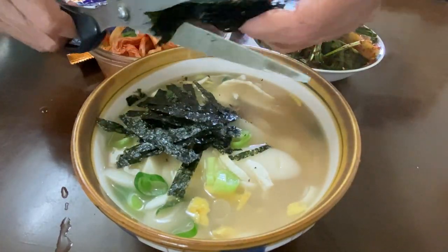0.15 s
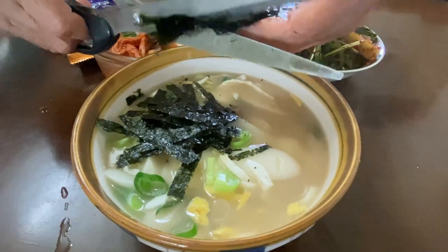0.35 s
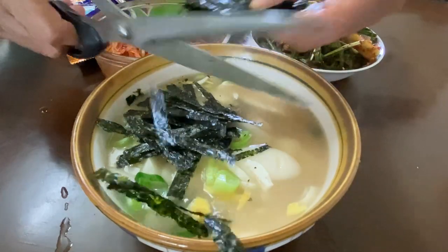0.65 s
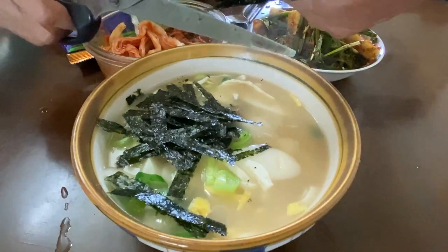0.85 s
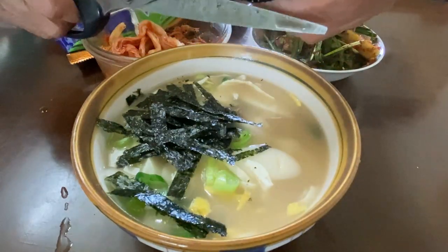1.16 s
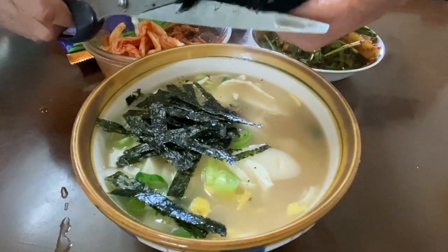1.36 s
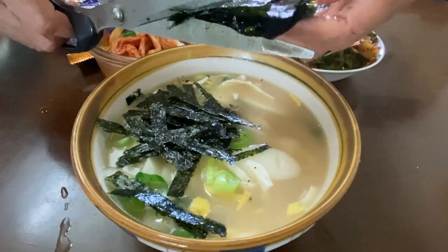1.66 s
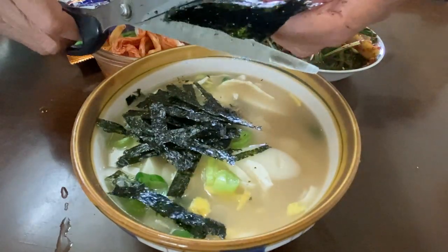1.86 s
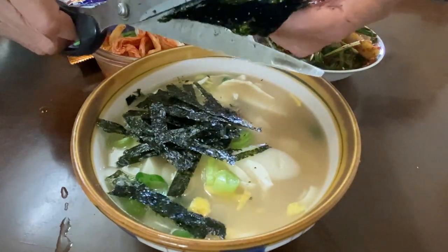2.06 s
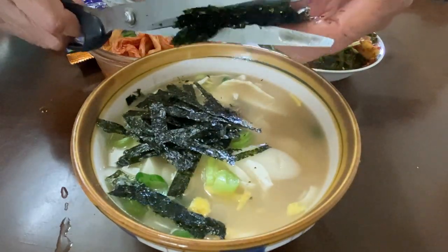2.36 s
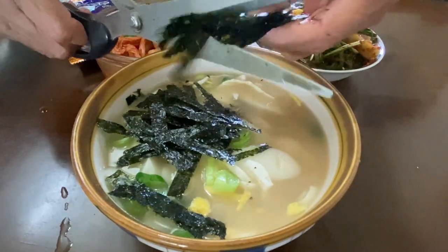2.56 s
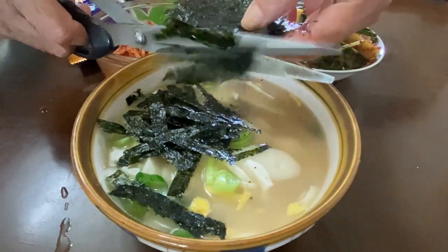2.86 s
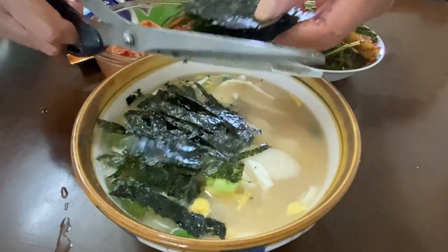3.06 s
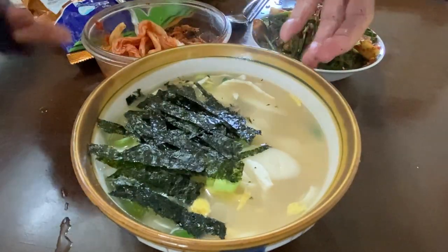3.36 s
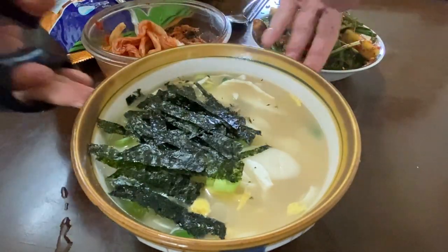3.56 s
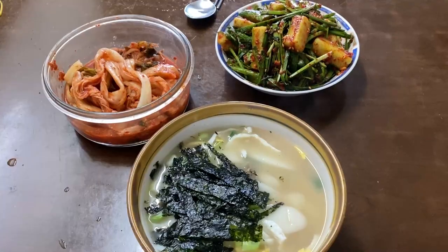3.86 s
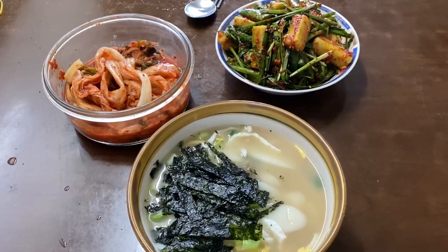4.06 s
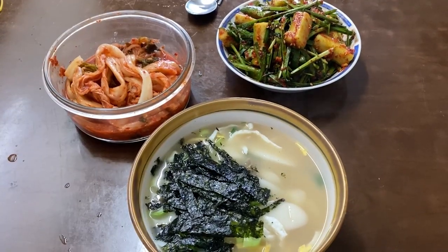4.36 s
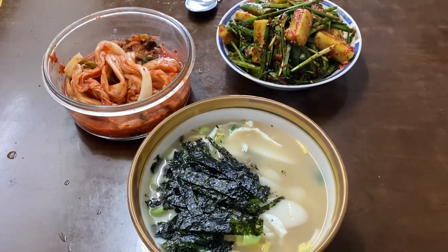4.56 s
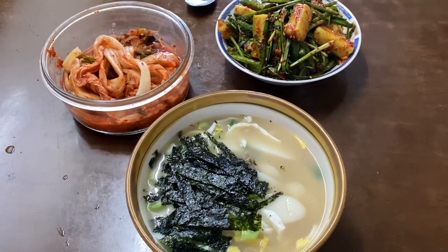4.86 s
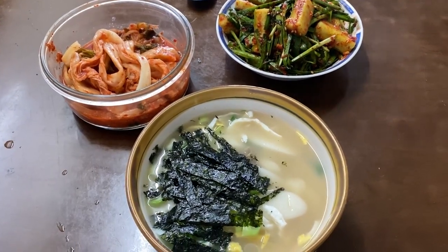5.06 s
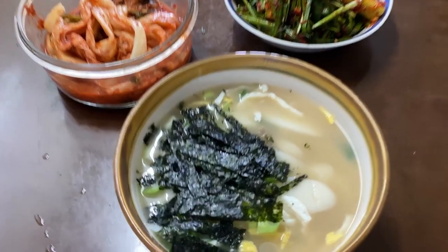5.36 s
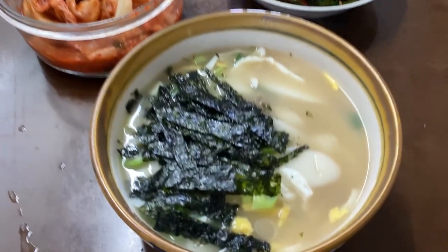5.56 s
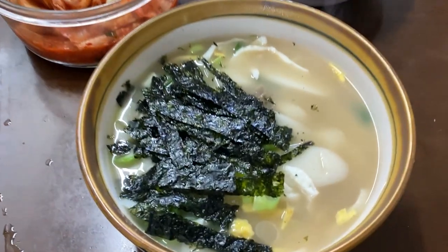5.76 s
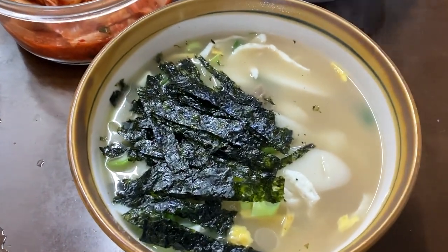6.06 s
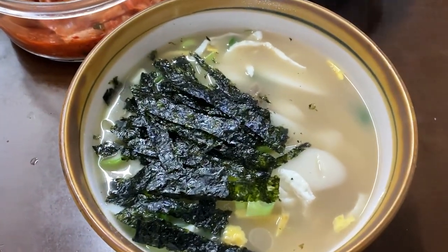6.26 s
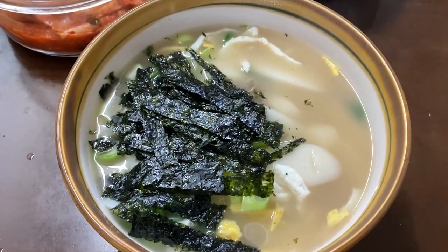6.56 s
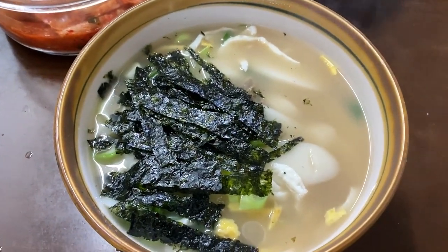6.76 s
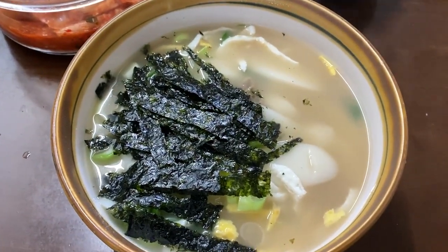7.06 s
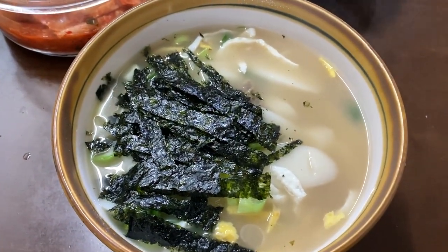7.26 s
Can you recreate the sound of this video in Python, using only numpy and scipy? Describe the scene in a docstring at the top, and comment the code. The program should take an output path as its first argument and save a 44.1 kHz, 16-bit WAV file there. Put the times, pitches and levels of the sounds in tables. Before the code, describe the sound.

A quiet indoor room with soft air and a faint wavering low hum. Close to a phone's stereo microphones, scissors cut dried seaweed: dry rubbing, then a dense, bright run of brittle snaps from 0.2 to 0.45 s, with a dull low bump at its end. A lull with tiny ticks follows; a second crackling cut builds from about 1.05 to 1.3 s. Sparse crinkles, one snap near 1.9, then crunches at 2.15-2.35 and 2.65-2.85 s, the last with another soft bump. Cracking fades by 3.4 s. A light steely click at 3.25 and small taps near 3.55 and 3.75 lead to a firmer double wooden knock at 4.15. Until about 5.4 s a crinkly, hollow rustle further off mixes with short gritty scrapes and a muted knock at 4.75. Near silence follows, with a tiny tick at 6.75, then the loudest table knock, sharp and briefly ringing, at 7.1 s.

```python
"""Scissors through dried seaweed

Kitchen scissors cut a crisp sheet over a bowl, close to a phone's two microphone ports: clumped noise snaps,
opened in short bursts over a fine rustle, are coloured as thin sheet and folded stack, with room decay behind.
The scissors are laid on the wooden table and a hard object knocks it: clicks, decaying noise and damped modes.
Gritty noise scrapes, sagging low bumps and a hissing, hollow rustle further off join them.
A quiet room lies underneath: shaped noise, a wavering low hum and a faint unsteady tone."""
import sys
import numpy as np
from scipy import signal
from scipy.fft import rfft, irfft, next_fast_len
from scipy.io import wavfile
from scipy.ndimage import uniform_filter1d, map_coordinates

SR = 44100
rng = np.random.default_rng(int(sys.argv[2]) if len(sys.argv) > 2 else 0)


def file_out(sig):
    """Save sig as 16-bit WAV at sys.argv[1]."""
    # one column per channel
    cols = np.atleast_2d(sig).T
    # limit, then scale
    lim = np.clip(cols, -1, 1)
    pcm = np.round(lim * 32767).astype(np.int16)
    wavfile.write(sys.argv[1], SR, pcm)


N = 327222  # samples

# Steady room air. Each row: frequency in Hz, relative density in dB per Hz.
AIR_COLOUR = [(15, -30), (25, -17.5), (50, -8.5), (210, -11.5), (600, -23.5), (1270, -31), (2000, -41),
              (4000, -57), (10000, -58), (13000, -66), (16000, -85.5)]
# Likeness of the air at the two ports. Each row: frequency in Hz, correlation from 0 to 1.
AIR_LIKENESS = [(60, 0.79), (240, 0.81), (950, 0.06), (3770, 0.12), (15000, 0.017)]
# Low hum of the room. Each row: time in seconds, level in dB before a common lift.
HUM_LEVEL = [(0, -72), (1.75, -66.5), (3, -68), (4.1, -54.5), (4.34, -45.5), (4.46, -61.5), (4.98, -51),
             (5.1, -61), (6.2, -56), (6.5, -58.5), (6.86, -46), (7.09, -54.5), (7.21, -46), (7.42, -45)]
# Faint unsteady tone over the hum. Each row: mean frequency in Hz, mean level in dB.
DRONE_TONES = [(218, -64)]
# The sheet rubs on fingers and blades. Each row: time in seconds, level in dB.
RUB_LEVEL = [(0, -48.5), (.19, -50.5), (.4, -47.5), (.52, -61.5), (.86, -89), (.93, -72), (.95, -49),
             (1.04, -59), (1.3, -50), (1.4, -56.5), (1.53, -75.5), (1.61, -67.5), (1.65, -51),
             (2.05, -55.5), (2.25, -40.5), (2.37, -50.5), (2.72, -43), (2.86, -55), (3.01, -63),
             (3.19, -59.5), (3.26, -73), (3.5, -89)]
# Bursts of cracking fibres. Each row: peak time in seconds, level in dB, stack relative to sheet in dB,
# fall time in ms.
CRACK_BURSTS = [(0.034, -39, -9.5, 8.2), (0.198, -40, -6, 25), (.228, -33.5, -11, 4.5),
                (.255, -38, -9.5, 6), (.282, -26, -8.5, 5), (.308, -28.5, -5, 11.7), (.341, -22, -8, 6.6),
                (.375, -24, -13, 5.4), (.395, -26.5, -10.5, 9.7), (.423, -24.5, -2, 6.7),
                (0.443, -25, -9, 7.8), (0.608, -49.5, -6, 6), (0.639, -50, -9.5, 12), (.707, -57, -23, 2.2),
                (.759, -47.5, -13, 3.8), (0.986, -43.5, -2.5, 7.5), (1.068, -45, 0, 22),
                (1.107, -38.5, -8, 4), (1.145, -38.5, -25, 4.7), (1.17, -38, -11, 4.9),
                (1.205, -33.5, -13.5, 6), (1.224, -28, -13.5, 6), (1.274, -24.5, -14.5, 5.7),
                (1.352, -47, -10, 10), (1.741, -48.5, -18, 3.6), (1.819, -53, -1.5, 14),
                (1.874, -34, -16.5, 6.8), (2.057, -38.5, -12, 3), (2.11, -47.5, -10, 17),
                (2.154, -39, -14.5, 22), (2.189, -33, -15.5, 11), (2.217, -29, -13.5, 15),
                (2.244, -23.5, -6, 7), (2.268, -25.5, -17, 9), (2.29, -22.5, -12.5, 12),
                (2.336, -27, -11.5, 4.8), (2.399, -47.5, -17, 7), (2.532, -47.5, -14, 7.4),
                (2.619, -43.5, -8.5, 11), (2.664, -31, -25.5, 4.09), (2.676, -24.5, -8, 5),
                (2.686, -32.5, -13, 12.4), (2.716, -23, -14, 6), (2.741, -25.5, -10.5, 8.7),
                (2.794, -27.5, -4.5, 8), (2.833, -31.5, -11, 11), (3.066, -56, -19, 7.8),
                (3.151, -42.5, -15.5, 3.5), (3.182, -51, -22, 8), (3.271, -50, -41, 2.2),
                (3.302, -60, -6, 4), (3.378, -55, -23, 1.5)]
# Thin sheet. Each row: frequency in Hz, relative density in dB per Hz.
SHEET_COLOUR = [(1290, -44), (2200, -5), (2480, -18), (3220, -2.5), (3940, -6.5), (4820, -0.5),
                (6100, -5.5), (6580, -3), (8770, -3), (11500, 2), (13500, -6), (15800, 0), (16500, -42.5)]
# Folded stack and blades. Each row: frequency in Hz, relative density in dB per Hz.
STACK_COLOUR = [(180, -32.5), (300, -8), (883, -8.5), (1150, 0), (1860, -1), (3200, -3), (4160, -36),
                (7040, -120)]
# Phase between the ports. Each row: frequency in Hz, lead of the left in radians.
PORT_LEAD = [(0, 1.1), (3100, 2.78), (3620, 4.85), (4570, 4.12), (6460, 4.47), (7240, 9.76), (9300, 16),
             (10300, 11.3), (11800, 11.34), (16000, 7.6)]
# Balance between the ports. Each row: frequency in Hz, left over right in dB.
PORT_TILT = [(60, -1.5), (180, -2), (550, 3.5), (1650, 5.5), (4970, 3), (15000, -3.5)]
# Soft low bumps. Each row: start in seconds, strength in dB, settled pitch in Hz, 60 dB decay in seconds.
LOW_BUMPS = [(0.467, -30, 61.2, 0.14), (2.788, -27, 50, 0.17), (3.516, -46, 103, 0.3),
             (3.586, -36.5, 77, 0.32), (5.307, -40, 200.6, 0.1)]
# Single scrapes and crinkles. Each row: peak time in seconds, level in dB, centre in Hz,
# band half-width in octaves, time scale in ms.
SCRAPE_EVENTS = [(.49, -43.5, 395, 1.9, 18), (2.822, -38, 399, 2.15, 25), (3.561, -71.5, 4150, 0.45, 51),
                 (3.571, -60.5, 1060, 0.43, 176), (3.9, -68.5, 7100, 1.4, 7.1),
                 (3.974, -69, 4500, 0.59, 23), (4.454, -47.5, 895, .3, 12), (4.52, -54.5, 4200, 0.36, 17),
                 (4.569, -49.5, 1220, 0.4, 33), (4.675, -49.5, 730, 0.36, 25),
                 (4.815, -50.5, 5000, 0.86, 20), (4.931, -44, 1140, 0.1, 19), (5.095, -51.5, 6000, 1.1, 11),
                 (5.219, -45, 3550, 1.1, 11.6), (5.33, -52.5, 3080, 0.18, 17),
                 (5.41, -55.5, 2146, 0.26, 38), (6.23, -71.5, 5000, 1.37, 50), (6.75, -45, 1970, 1.5, 1.04)]
# Knocks on the table. Each row: start in seconds, strength in dB, then relative to it treble in dB,
# steel ring in dB and dish ring in dB, share of the full decay time, relative contact click in dB.
TABLE_KNOCKS = [(3.236, -35, -14, -13, -27, 0.36, 3), (3.554, -53.5, -8.5, -13.5, -27, 1, -2),
                (3.734, -38.5, -38, -32, -25, 0.96, -2.5), (4.136, -28, -26.5, -21, -23, 0.56, -2),
                (4.149, -27, -43, -18, -25, 0.95, -20), (4.751, -32.5, -34, -39, -26, 1, -7.5),
                (5.306, -45.5, -4.5, -29, -24, 0.62, -4), (7.1122, -18, -14, -26.5, -16.5, 0.92, -7)]
# Wooden table top. Each row: frequency in Hz, relative density in dB per Hz.
WOOD_COLOUR = [(47, -31.5), (100, -1), (550, -2.5), (1350, -7), (1700, -16), (2050, -11), (3150, -26.5),
               (3600, -25.5), (9900, -31), (13000, -49.5)]
# Full decay of a knock's noise. Each row: frequency in Hz, 60 dB decay in seconds.
KNOCK_DECAY = [(100, 0.54), (500, 0.45), (2000, 0.36), (10000, 0.22)]
# Modes of the steel. Each row: frequency in Hz, relative level in dB, full 60 dB decay in seconds.
STEEL_MODES = [(3420, -3, .16), (3456, 0, .3), (3500, -4, .25), (5220, -11, .14)]
# Modes of the board. Each row: frequency in Hz, relative level in dB, full 60 dB decay in seconds.
BOARD_MODES = [(235, -1, .3), (345, -2, .25), (445, -4, .25), (548, 0, .18), (640, -1, .12), (735, -3, .2),
               (1200, -6, .2)]
# Modes of the dish. Each row: frequency in Hz, relative level in dB, full 60 dB decay in seconds.
DISH_MODES = [(1240, -2, .2), (1975, 0, .32), (2370, -7, .17), (2880, -5, .1)]
# Contact click. Each row: frequency in Hz, relative density in dB per Hz.
CLICK_COLOUR = [(300, 0), (1200, 15.5), (2800, -5), (11000, -20.5), (13500, -31.0)]
# Rustle further off. Each row: time in seconds, level in dB.
RUSTLE_LEVEL = [(3.3, -81), (3.45, -85.5), (4.07, -83), (4.15, -54.5), (4.32, -62), (4.5, -55), (4.72, -61),
                (4.79, -50.5), (4.88, -56.5), (5.31, -60), (5.47, -68), (5.75, -100), (6.99, -90),
                (7.42, -60)]
# Hiss of the rustle. Each row: frequency in Hz, relative density in dB per Hz.
HISS_COLOUR = [(1060, -4), (1800, -8), (6060, -11), (8230, -18.5), (10300, -12), (15500, -30),
               (16500, -25.5)]
# Resonances of the hollow scrape. Each row: frequency in Hz, width in Hz, level in dB before sharpening.
HOLLOW_MODES = [(835, 520, -2), (1158, 66, 0.5), (1710, 340, -5.5), (2600, 340, -8.5)]

HUM_HZ, HUM_LIFT_DB, AIR_DB = 54.4, 2.0, -56
RUB_STACK_DB = -10.5  # the stack relative to the rubbing sheet
RISE_SHARE = 0.71  # rise time of a burst over its fall time
HOLLOW_DB = 0  # the hollow scrape relative to the hiss
TOP_HZ = 16300  # band limit of the phone


def amp(db):
    """Turns dB into an amplitude factor."""
    return 10 ** (np.asarray(db) / 20)


def unit(x):
    """Scales to an rms of one."""
    return x / np.sqrt(np.mean(x ** 2) + 1e-20)


def along(points, hz):
    """Reads (Hz, value) points on a log frequency axis."""
    f, v = np.transpose(points)
    return np.interp(np.log(hz + 1), np.log(f + 1), v)


def curves(rows):
    """One value per sample for each level column; -200 dB outside the table."""
    s, *cols = np.transpose(rows)
    return [np.interp(np.arange(N) / SR, s, c, -200, -200) for c in cols]


def wobble(rate, size=None):
    """A smooth random curve, rate knots a second."""
    at = np.arange(size or N) * rate / SR
    return map_coordinates(rng.standard_normal(int(at[-1]) + 4), [at])


def filtered(x, response):
    """Applies a complex response of frequency to x."""
    m = next_fast_len(N + SR // 2)
    return irfft(rfft(x, m) * response(np.fft.rfftfreq(m, 1 / SR)), m)[..., :N]


def colour(points):
    """A response that keeps white noise at its power."""
    return lambda hz: unit(amp(along(points, hz)))


def grit(clump_db, rate):
    """A dense stream of tiny snaps: white noise whose level wanders into clumps."""
    return unit(rng.standard_normal(N) * amp(clump_db * wobble(rate)))


def spread(alike):
    """Stereo white noise whose two sides resemble each other by frequency."""
    def mid_side(hz):
        turn = np.arccos(np.clip(along(alike, hz), -1, 1)) / 2
        return np.array([np.cos(turn), np.sin(turn)])
    mid, side = filtered(rng.standard_normal((2, N)), mid_side)
    return np.array([mid + side, mid - side])


def patchy(x, patchy_db, bins, frames):
    """Random patches of gain over time and frequency, shared by both sides."""
    z = signal.stft(x, nperseg=256)[2]
    field = rng.standard_normal(z.shape[-2:])
    field = uniform_filter1d(uniform_filter1d(field, bins, 0), frames, 1)
    gain = amp(patchy_db * unit(field))
    return signal.istft(z * gain / np.sqrt(np.mean(gain ** 2)), nperseg=256)[1][..., :N]


def swell(t, rise, fall, power):
    """Rises to 1 at t = 0 and falls again."""
    return np.exp(-np.where(t < 0, -t / rise, t / fall) ** power)


def room():
    """Steady room air and a low hum that swells and wavers, with a fainter tone above it."""
    def tone(hz, drift_hz):
        return np.sin(2 * np.pi * np.cumsum(hz + drift_hz * wobble(5.5)) / SR)

    def air_response(hz):
        return colour(AIR_COLOUR)(hz) * (abs(hz - HUM_HZ) > 9)  # leaves a gap for the hum

    air = amp(AIR_DB + 0.63 * wobble(5)) * filtered(spread(AIR_LIKENESS), air_response)
    drone = sum(amp(db + 3.8 * wobble(6.5)) * tone(hz, 4) for hz, db in DRONE_TONES)
    hum_db = curves(HUM_LEVEL)[0] + HUM_LIFT_DB + 1.0 * wobble(4.8)
    return air + drone + amp(hum_db) * tone(HUM_HZ, .8)


def seaweed():
    """Cracks and rubbing open a stream of snaps that rings the sheet and, lower, the folded stack."""
    rub_db, = curves(RUB_LEVEL)
    flutter_db = 0.49 * wobble(60)  # fingers slip unevenly
    # lone fibres give way, about 70 a second, only in the sheet
    pops = (rng.random(N) < 70 / SR) * amp(rng.normal(5.2, 4, N))
    pops = np.convolve(pops, np.exp(-np.arange(128) / 22))[:N]
    sheet_level = amp(rub_db + flutter_db) * (1 + pops)
    stack_level = amp(rub_db + RUB_STACK_DB + flutter_db)
    t = np.arange(N) / SR
    for s, db, stack_db, fall_ms in CRACK_BURSTS:
        near = slice(max(round((s - .1) * SR), 0), round((s + .1) * SR))
        burst = amp(db) * swell(1000 * (t[near] - s), RISE_SHARE * fall_ms, fall_ms, power=1.5)
        sheet_level[near] += burst
        stack_level[near] += burst * amp(stack_db)

    def ports(hz):  # two spaced microphone ports share the tilt and the lead
        left = amp(along(PORT_TILT, hz) / 2) * np.exp(.5j * np.interp(hz, *np.transpose(PORT_LEAD)))
        return np.array([left, 1 / left])

    snaps = grit(clump_db=6, rate=1500) * np.array([sheet_level, stack_level])
    close = filtered(snaps[0], colour(SHEET_COLOUR)) + filtered(snaps[1], colour(STACK_COLOUR))
    # every fold rings at its own pitches
    direct = filtered(patchy(close, patchy_db=3.5, bins=9, frames=4), ports)
    # the room answers with unrelated noise that follows the dying energy
    decay_s = np.array([[.22], [.3]])  # 60 dB decay for sheet and stack
    fade = amp(-120 * t[:SR // 2] / decay_s)  # doubled dB, as this fades energy
    energy = signal.fftconvolve(snaps ** 2, fade / fade.sum(1, keepdims=True), axes=1)[:, :N]
    sheet_room, stack_room = [filtered(np.sqrt(abs(e)) * rng.standard_normal((2, N)), colour(c))
                              for e, c in zip(energy, (SHEET_COLOUR, STACK_COLOUR))]
    return direct + amp(-7.5) * sheet_room + amp(-5.5) * stack_room


def bumps():
    """Dull pushes, two damped partials whose pitch sags as the contact loosens."""
    out, t = np.zeros((2, N + SR)), np.arange(SR // 2) / SR
    for s, db, hz, t60 in LOW_BUMPS:
        turns = hz * (t + 1.77 * 0.00886 * (1 - np.exp(-t / 0.0083)))  # starts sharp, then settles
        offset = rng.normal(0, 0.19, (2, 1))  # the upper partial differs between the sides
        ring = np.sin(2 * np.pi * turns) + 0.6 * np.sin(2 * np.pi * (2.5 * turns + offset))
        envelope = amp(db - 60 * t / t60) * (1 - np.exp(-t / 0.0097))
        out[:, round(s * SR):][:, :len(t)] += envelope * ring
    return out[:, :N]


def scrapes():
    """Short swells of gritty noise, each in its own band."""
    out, t = np.zeros((2, N)), np.arange(SR // 2) / SR - .25
    hz = np.fft.rfftfreq(len(t), 1 / SR) + 1
    for s, db, centre_hz, octaves, ms in SCRAPE_EVENTS:
        grain = rng.standard_normal((2, len(t))) * amp(3.1 * wobble(360, size=len(t)))
        band_shape = np.exp(-(np.log2(hz / centre_hz) / octaves) ** 2)
        band = unit(irfft(rfft(grain) * band_shape, len(t)))
        envelope = amp(db) * swell(1000 * t, 1.2 * ms, 0.73 * ms, power=0.83)
        out[:, round((s + t[0]) * SR):][:, :len(t)] += band * envelope
    return out


def tail(t60_of, length):
    """Stereo noise in which each frequency dies at its own speed."""
    hz, t, z = signal.stft(rng.standard_normal((2, length)), SR, nperseg=128)
    return signal.istft(z * amp(-60 * t / t60_of(hz)[:, None]), SR, nperseg=128)[1][:, :length]


def ringing(modes, t, share):
    """Damped modes at new strengths, not quite in step on the two sides; echoes make each one throb."""
    out = 0
    for hz, db, t60 in modes:
        strength_db = db + rng.normal(0, 2.6, (2, 1))
        throb_db = 3.3 * wobble(59, size=len(t))
        level = amp(strength_db + throb_db - 60 * t / (share * t60))
        out = out + level * np.sin(2 * np.pi * (hz * t + rng.normal(0, 0.18, (2, 1))))
    return out


def knocks():
    """Each knock clicks, shakes the table top into the room and rings the steel and the dish standing on it."""
    low, high, rung, clicks = np.zeros((4, 2, N + SR))
    t = np.arange(SR // 2) / SR
    build = 1 - np.exp(-t / 0.0019)  # the board takes a moment to move
    for s, db, treble_db, steel_db, dish_db, share, click_db in TABLE_KNOCKS:
        boom = build * tail(lambda hz: share * along(KNOCK_DECAY, hz), len(t))
        at = np.s_[:, round(s * SR):round(s * SR) + len(t)]
        low[at] += amp(db - 7.0) * boom
        high[at] += amp(db + treble_db + 13.5) * boom
        rung[at] += amp(db + steel_db) * ringing(STEEL_MODES, t, share ** 1.9)
        rung[at] += amp(db - 9.5) * build * ringing(BOARD_MODES, t, share)
        rung[at] += amp(db + dish_db) * build * ringing(DISH_MODES, t, share)
        clicks[at] += amp(db + click_db - 60 * t / 0.0084) * rng.standard_normal(len(t))

    def bright(hz):  # treble share, crossing over at 2600 Hz
        return 1 / (1 + (2600 / (hz + 1)) ** 6)

    wood = colour(WOOD_COLOUR)
    out = filtered(low[:, :N], lambda hz: wood(hz) * (1 - bright(hz)))
    out += filtered(high[:, :N], lambda hz: wood(hz) * bright(hz))
    out += rung[:, :N] + filtered(clicks[:, :N], colour(CLICK_COLOUR))
    # long waves reach both ports alike
    alike = lambda hz: 1 / (1 + (hz / 250) ** 2)
    return out + filtered(out[::-1] - out, lambda hz: alike(hz) / 2)


def rustle():
    """A crinkly hiss and a hollow scrape through resonances, flickering together."""
    def box(hz):
        modes = sum(amp(db) * 1j * hz * width / (centre * centre - hz * hz + 1j * hz * width)
                    for centre, width, db in HOLLOW_MODES)
        return unit(abs(modes) ** 1.5)  # the power sharpens the peaks

    level_db, = curves(RUSTLE_LEVEL)
    flicker_db = 1.4 * wobble(40) + 1.5 * wobble(150)
    # one likeness of the two sides for all frequencies
    hiss = filtered(spread([(1000, 0.5)]) * amp(level_db + flicker_db), colour(HISS_COLOUR))
    hollow = filtered(spread([(1000, 0.34)]) * amp(level_db + flicker_db + HOLLOW_DB), box)
    return patchy(hiss + hollow, patchy_db=3.0, bins=3, frames=8)


def scene():
    """Everything at the table, over the room."""
    return room() + seaweed() + bumps() + scrapes() + knocks() + rustle()


def record(dry):
    """The phone keeps nothing above its band limit."""
    return filtered(dry, lambda hz: hz < TOP_HZ)


dry = scene()
out = record(dry)
file_out(out)
```